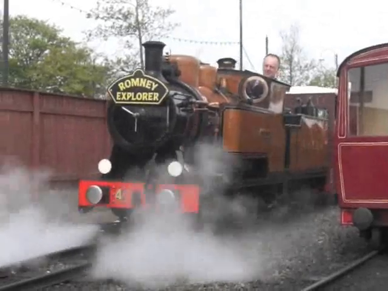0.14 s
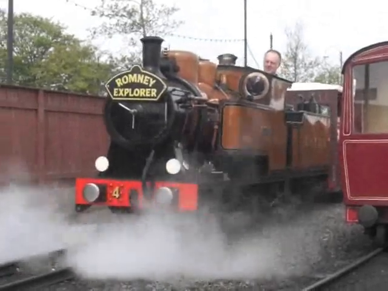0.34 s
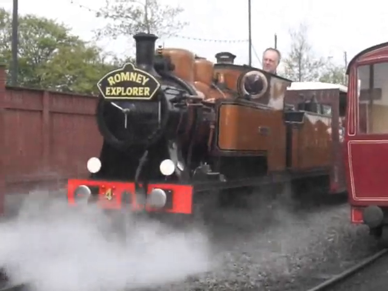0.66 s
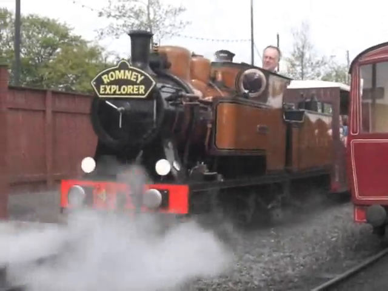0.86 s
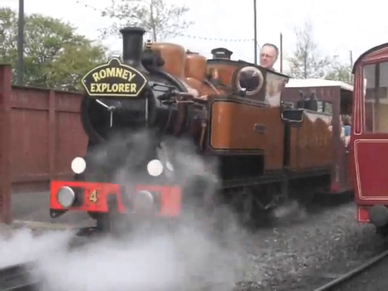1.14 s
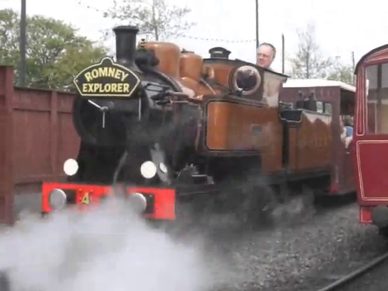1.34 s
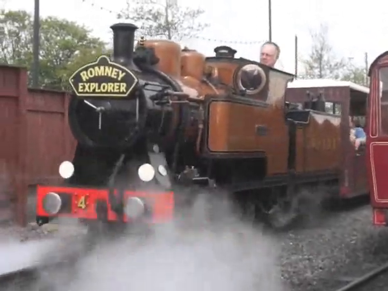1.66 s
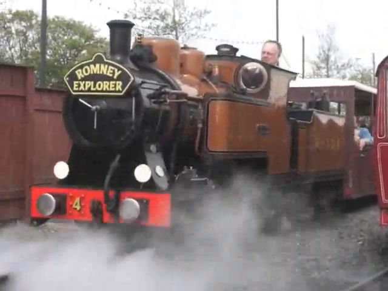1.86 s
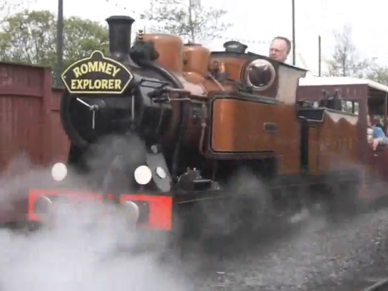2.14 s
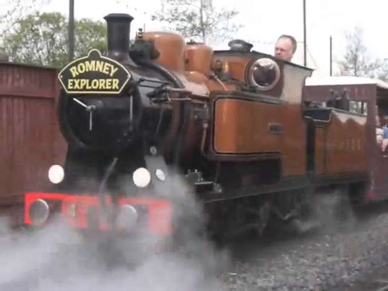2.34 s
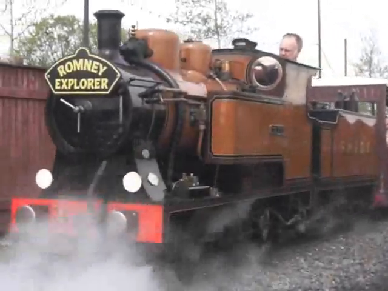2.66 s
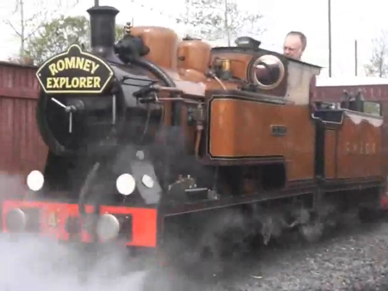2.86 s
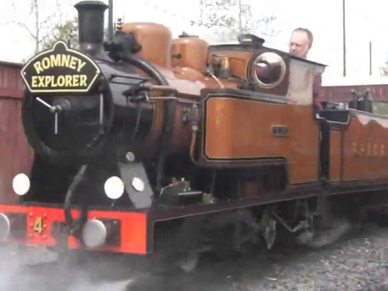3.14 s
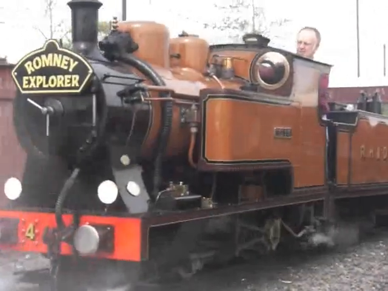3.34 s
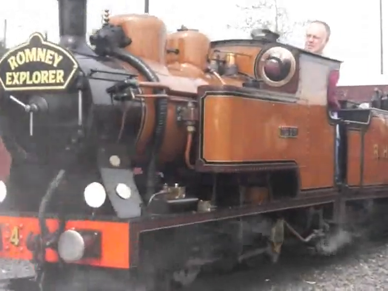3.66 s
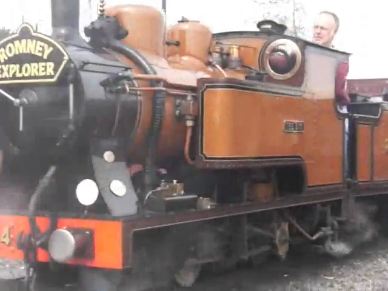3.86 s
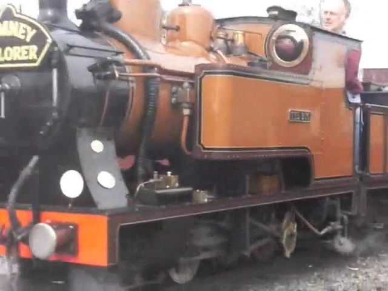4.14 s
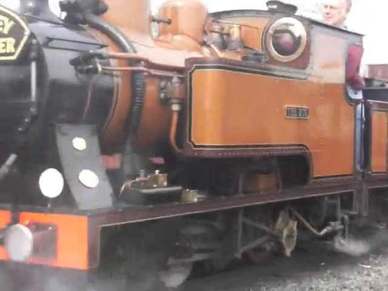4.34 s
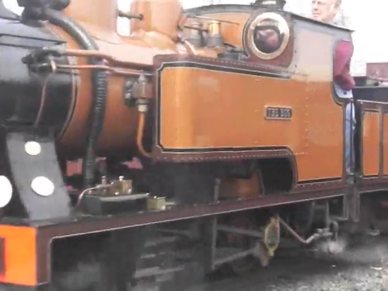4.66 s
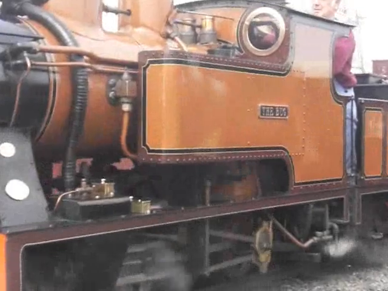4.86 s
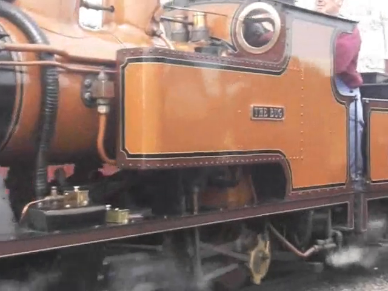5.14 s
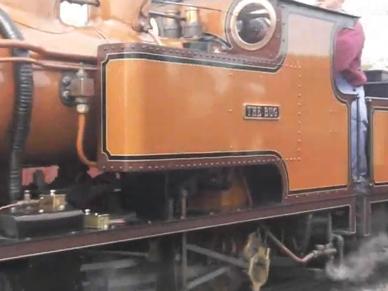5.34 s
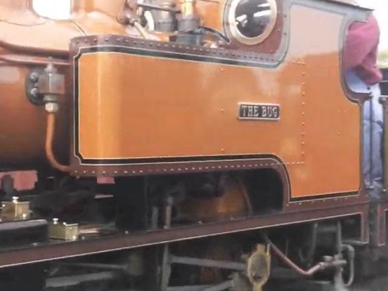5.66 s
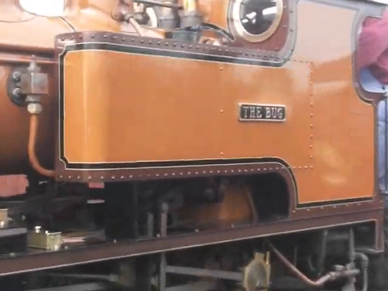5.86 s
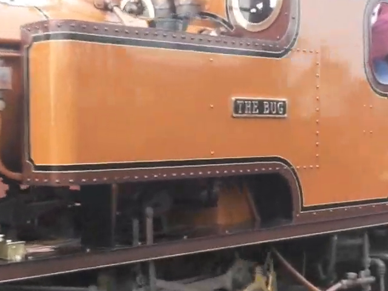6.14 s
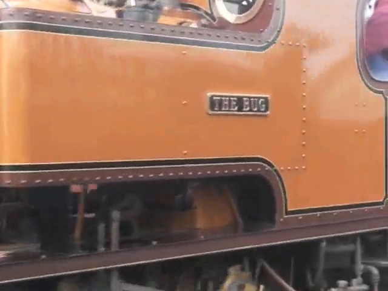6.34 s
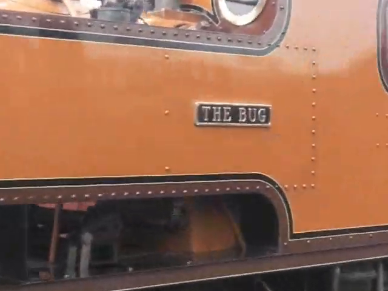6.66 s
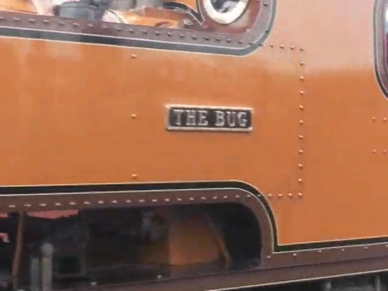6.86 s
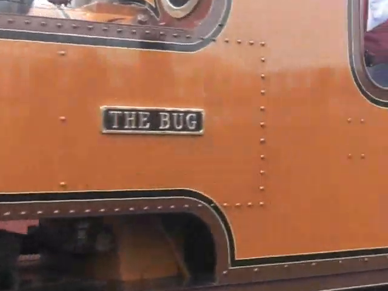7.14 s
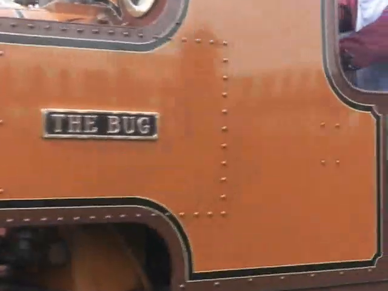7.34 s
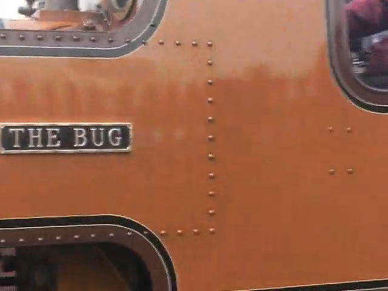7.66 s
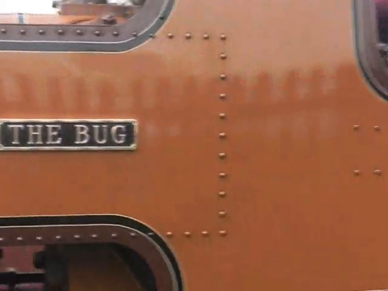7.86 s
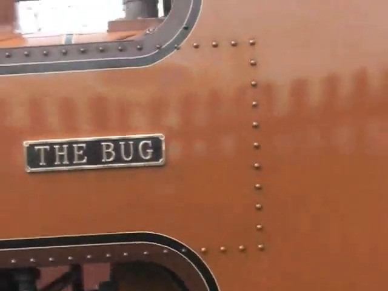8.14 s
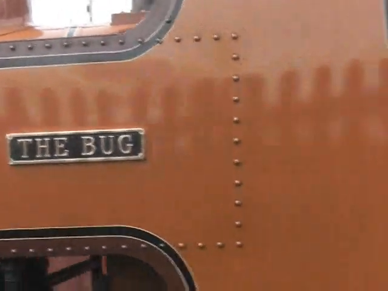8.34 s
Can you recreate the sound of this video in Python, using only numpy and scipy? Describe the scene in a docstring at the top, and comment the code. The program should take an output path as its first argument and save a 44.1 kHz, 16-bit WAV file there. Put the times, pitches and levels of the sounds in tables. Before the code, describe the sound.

A small steam locomotive creeps past, hissing loudly in surges, with soft hollow chuffs that quicken over a low rumble.

```python
"""On a ballasted railway track, a small steam locomotive creeps past with its cylinder drain cocks open.
The turbulent jets hiss in surges and roar where they strike the ground; interference with their ground
reflections gives a slow phasing. Exhaust beats excite the chimney's air column in soft, hollow chuffs
that quicken and come nearer, over a low hum and the rumble of the train."""
import sys
import numpy as np
from scipy import signal
from scipy.fft import rfft, irfft
from scipy.io import wavfile
from scipy.ndimage import uniform_filter1d

SR = 44100
rng = np.random.default_rng(int(sys.argv[2]) if len(sys.argv) > 2 else 0)


def int16_out(signal):
    """Quantize to a 16-bit WAV file."""
    q = np.round(np.clip(np.atleast_2d(signal).T, -1, 1) * 32767)
    wavfile.write(sys.argv[1], SR, q.astype(np.int16))


N = 375275
HOP = 256
TIME = np.arange(N) / SR
FRAME_S = np.arange(N // HOP + 5)[:, None] * HOP / SR
BIN_HZ = np.fft.rfftfreq(4 * HOP, 1 / SR)

# the jets' changing aspect as the engine passes:
# (time [s], share heard from beside [0-1], treble lift [dB/octave], roar relative to rasp [dB])
ASPECT = [(0, 0, 1, -16.5), (1, 0, 1, -17.5), (2.5, 0, 2, -13.5), (3.5, .4, -0.5, -18.5),
          (4.1, 0, 0, -16.5), (4.35, 0.4, 3, -18.5), (5.3, 0.99, 1.5, -17), (6.4, .8, 2, -15),
          (7.2, 0.2, 0, -12.5), (8.51, 0, -0.5, -12)]


def gain_of(db):
    """Decibels to amplitude ratio."""
    return 10 ** (np.asarray(db) / 20)


def unit_rms(x):
    """Normalisation to rms 1."""
    return x / np.sqrt(np.mean(x ** 2) + 1e-20)


def spectrum_db(points, hz):
    """Spectral level, interpolated over log frequency."""
    f, db = np.transpose(points)
    return np.interp(np.log(hz + 1), np.log(f), db)


def follow(rows, t):
    """Linear interpolation of each column at times t."""
    times, *columns = np.transpose(rows)
    return [np.interp(t, times, column) for column in columns]


def add(mix, start_s, sound):
    """Superposition of a sound on the mix."""
    part = mix[round(start_s * SR):][:len(sound)]
    part += sound[:len(part)]


def noise(spectrum):
    """White noise filtered to a given spectrum, rms 1."""
    response = gain_of(spectrum_db(spectrum, np.fft.rfftfreq(N, 1 / SR)))
    return unit_rms(irfft(rfft(rng.standard_normal(N)) * response, N))


def wander(rate_hz):
    """Random modulation, rms 1, strongest near the given rate."""
    ratio = np.fft.rfftfreq(N, 1 / SR) / rate_hz
    return unit_rms(irfft(rfft(rng.standard_normal(N)) * ratio / (1 + ratio ** 3), N))


def swell(t, peak_s):
    """A critically damped pulse: a quick rise to 1, then a slower fall."""
    return t / peak_s * np.exp(1 - t / peak_s)


def gust(start, length, attack_s, release_s, arch_db):
    """Amplitude envelope of a rush of steam: it opens, peaks midway and closes."""
    t = TIME - start
    gate = np.clip(t / attack_s, 0, 1) * np.clip((length - t) / release_s, 0, 1)
    live = gate > 0
    gate[live] *= gain_of(-arch_db * (2 * t[live] / length - 1) ** 2)
    return gate


def jolts(rise_s=.028):
    """Dull jolts of the train as damped pulses: one envelope for rumble, one for running gear."""
    # (time [s], rumble level [dB], running gear level [dB])
    bumps = [(3.46, -46, -60), (3.94, -40, -51), (4.17, -36, -52), (4.56, -42, -55), (6.84, -35, -50)]
    return sum(gain_of(levels_db)[:, None] * swell(np.maximum(TIME - start, 0), rise_s)
               for start, *levels_db in bumps)


def rumble(jolt, gain_db=-1.5):
    """Low rolling noise of the train; rolling and jolts add in power."""
    # rolling noise: (time [s], level [dB])
    levels = [(0, -49), (1, -48.5), (1.8, -45), (3.25, -48.5), (3.95, -40.5), (4.4, -47.5), (5, -47.5),
              (6.6, -50), (8, -42), (8.51, -44)]
    # its spectrum: (frequency [Hz], level [dB])
    spectrum = [(12, -20), (28, -1), (42, -1.5), (65, 1), (100, -1.5), (160, -5), (300, -12.5), (600, -19),
                (1500, -38)]
    rolling = gain_of(follow(levels, TIME)[0])
    return noise(spectrum) * np.hypot(rolling, jolt) * gain_of(gain_db)


def running_gear(jolt, uneven_db=2.5):
    """Wheels and rods grumble: dull noise under random amplitude modulation."""
    # the gear drawing level: (time [s], level [dB])
    levels = [(0, -53), (5.3, -64), (6.7, -59), (7.3, -47), (8.15, -41.5), (8.51, -48)]
    # its spectrum: (frequency [Hz], level [dB])
    spectrum = [(50, -6), (110, -5.5), (230, -4.5), (420, -4), (700, -15), (1500, -30)]
    grumble = gain_of(follow(levels, TIME)[0])
    return noise(spectrum) * np.hypot(grumble, jolt) * gain_of(uneven_db * wander(rate_hz=14))


def hum(waver=0.0043):
    """A low tone and its second harmonic, under slight frequency modulation."""
    # (time [s], pitch [Hz], fundamental level [dB], octave level [dB])
    tone = [(0, 67, -60, -57), (.95, 66.6, -51, -50.5), (1.2, 66.4, -60, -66), (2.9, 63.85, -60, -60),
            (3.6, 64, -55, -54.5), (3.95, 64, -54, -43), (4.5, 63.7, -60, -58), (5.5, 64, -62, -54.5),
            (8.51, 63.2, -63, -55.5)]
    hz, first_db, second_db = follow(tone, TIME)
    phase = 2 * np.pi * np.cumsum(hz * (1 + waver * wander(rate_hz=3.7))) / SR
    return np.sqrt(2) * (gain_of(first_db) * np.sin(phase) + gain_of(second_db) * np.sin(2 * phase))


def chuffs(puff_s=0.011, chuff_db=-1, thump_s=0.016, thump_hz=44, thump_lead_s=0.027, thump_db=1):
    """Each exhaust beat expels a slug of air; its crest and ragged puff excite the chimney's modes."""
    # exhaust beats: (time [s], level [dB], chimney pitch [Hz], thump level [dB])
    beats = [(3.117, -33.5, 574, -56), (3.422, -32, 567, -43), (3.999, -36, 540, -36),
             (4.861, -27.5, 552, -54), (5.417, -33, 505, -52), (5.669, -31, 540, -41),
             (5.908, -34.5, 515, -40), (6.141, -31.5, 528, -46), (6.388, -28, 550, -46),
             (6.622, -30.5, 530, -39), (6.847, -28.5, 520, -42), (7.082, -35, 497, -40),
             (7.308, -25, 560, -46), (7.535, -25, 547, -41), (7.735, -28.5, 530, -39),
             (7.968, -22, 540, -29), (8.185, -20, 533, -37), (8.388, -23.5, 522, -39)]
    # air column resonances: (frequency / pitch [ratio], bandwidth [Hz], level [dB])
    modes = [(1.02, 25, 4.5), (.85, 22, -2.5), (1.13, 55, -5.5), (1.28, 70, -7), (1.48, 110, -12),
             (1.9, 140, -9)]
    out, t = np.zeros(N), np.arange(SR // 4) / SR
    crest = SR // 20
    envelope = np.exp(-abs(t - t[crest]) / puff_s)
    for time_s, level_db, pitch_hz, low_db in beats:
        onset = np.minimum(t * pitch_hz, 1)  # the air column takes a cycle to speak
        ring = np.zeros(len(t))
        for ratio, width_hz, db in modes:
            mode = onset * np.exp(-np.pi * width_hz * t) * np.sin(2 * np.pi * ratio * pitch_hz * t)
            puff = signal.fftconvolve(envelope * rng.standard_normal(len(t)), mode)[:len(t)]
            push = np.r_[np.zeros(crest), mode[:-crest]]
            ring += gain_of(db) * unit_rms(unit_rms(push) + unit_rms(puff))
        ring *= np.linalg.norm(envelope) / np.linalg.norm(ring)
        thump = swell(t, thump_s) * np.sin(2 * np.pi * thump_hz * t)
        add(out, time_s - t[crest], gain_of(level_db + chuff_db) * ring)
        add(out, time_s - thump_lead_s, gain_of(low_db + thump_db) * thump)
    return out


def ground_roar(rasp_flow, blast_flow, roar_db=3.5, flutter_db=0.6):
    """Impingement noise of steam on ballast: a little with every surge, much in a blast."""
    # (frequency [Hz], level [dB])
    spectrum = [(40, -7.5), (120, -5), (250, -1.5), (420, -2), (600, 0), (1100, -1), (1600, 0.5),
                (2500, -1.5), (5000, -25)]
    grazing = rasp_flow * gain_of(follow(ASPECT, TIME)[2])
    roar = noise(spectrum) * np.hypot(grazing, blast_flow)
    return roar * gain_of(roar_db + flutter_db * wander(rate_hz=17))


def passing_rush():
    """Directivity: the focused noise band of the near cock swells and fades as it passes."""
    # (start [s], duration [s], level [dB])
    passage = (3.68, 0.86, -25.5)
    # (frequency [Hz], level [dB])
    spectrum = [(2500, -26), (3300, -6), (4200, -4), (4800, -1), (5350, -1), (5600, -8), (5900, -25),
                (8000, -47)]
    start, length, db = passage
    envelope = gust(start, length, attack_s=0.22, release_s=0.089, arch_db=2)
    return noise(spectrum) * gain_of(db) * envelope


def steam_flow(blast_hiss_db=12.5, band_octaves=0.14):
    """Incoherent leak, surges and blasts add in power: hiss, rasp and blast amplitudes, and band lift."""
    # steam escaping between surges: (time [s], hiss level [dB], rasp level [dB])
    leak = [(0, -23.5, -29), (.8, -22, -29), (1.7, -18, -24), (2.9, -21, -26.5), (3.4, -25, -27),
            (3.62, -25, -27.5), (3.85, -21.5, -22), (4.3, -22.5, -23.5), (4.85, -17, -23), (5.4, -21, -26),
            (6.4, -23, -29.5), (7.7, -24.5, -30.5), (8.51, -23, -30)]
    # blasts that strike the ballast: (start [s], duration [s], roar level [dB])
    blasts = [(1.055, 0.13, -35.5), (1.478, 0.61, -32), (2.06, 0.26, -31.5), (2.306, 0.614, -33),
              (4.388, 0.385, -29.5), (4.902, 0.4, -33)]
    # surges, uneven at first, later one to every two chuffs:
    # (start [s], duration [s], hiss level [dB], rasp level [dB], band centre [Hz], band lift [dB])
    surges = [(-.115, 0.55, -18.5, -31, 8250, 5), (0.452, 0.28, -20.3, -27.5, 6700, 3),
              (.82, 0.42, -20.8, -34, 8000, 6), (1.038, 0.36, -18, -25, 6000, .5),
              (1.444, 0.77, -17.2, -24.5, 6000, 2), (1.578, .13, -16.5, -23, 5500, 3),
              (2.108, 0.5, -16, -23.5, 7000, .5), (2.47, 0.46, -16, -22, 6000, 5),
              (2.907, .21, -16, -26.5, 5200, 1), (3.03, 0.36, -21, -42, 10000, 1),
              (3.433, .14, -19.5, -27, 10500, 3), (3.873, .18, -19, -24.5, 9500, 3),
              (4.081, 0.11, -21, -26, 9500, 1), (4.25, 0.18, -17, -27, 10500, 2),
              (4.34, .47, -16.5, -24, 8500, 2), (4.887, .46, -17, -29.5, 10170, 2),
              (5.469, .12, -22, -29, 10500, 4), (5.623, .16, -19.5, -29, 10500, .5),
              (5.918, .38, -20.5, -28.5, 6000, 1.5), (6.416, 0.31, -21, -31, 6510, 1.5),
              (6.88, 0.34, -19, -29.5, 10600, 3), (7.349, .3, -18, -28.5, 10800, 3),
              (7.792, .35, -18.5, -28, 8350, 2), (8.203, 0.27, -17.5, -29, 7000, 2)]
    blast = sum((gain_of(db) * gust(start, length, attack_s=0.048, release_s=0.034, arch_db=3.5)) ** 2
                for start, length, db in blasts)
    hiss, rasp = gain_of(follow(leak, TIME)) ** 2
    hiss += blast * gain_of(blast_hiss_db) ** 2
    powers, bands = [], []
    for start, length, hiss_db, rasp_db, band_hz, lift_db in surges:
        power = gust(start, length, attack_s=0.033, release_s=0.029, arch_db=5) ** 2
        hiss += power * gain_of(hiss_db) ** 2
        rasp += power * gain_of(rasp_db) ** 2
        powers.append(np.interp(FRAME_S, TIME, power) * gain_of(hiss_db) ** 2)
        bands.append(lift_db * np.exp(-.5 * (np.log2((BIN_HZ + 1) / band_hz) / band_octaves) ** 2))
    # each surge lifts its own band by its share of the hiss power
    band_db = np.hstack(powers) @ np.array(bands) / np.interp(FRAME_S, TIME, hiss)
    return np.sqrt(hiss), np.sqrt(rasp), np.sqrt(blast), band_db


def ground_comb(max_strength=.3):
    """Interference of direct and reflected sound: a moving comb filter, in dB."""
    # the ground reflection: (time [s], delay [ms], strength before the cap [ratio])
    ground = [(0, 1.9, 0.16), (.33, 1.7, 0.26), (.45, 1.42, 0.1), (1.1, 1.3, 0.36), (1.4, 1.5, 0.01),
              (2.4, 1.7, 0.07), (3.1, 1.78, .18), (4, 2.3, .14), (4.6, 2.2, .08), (8.51, 1.9, .07)]
    # all reflections, relative to it: (delay [ratio], strength [ratio])
    paths = [(1, .8), (.865, .8), (1.09, .4), (3.6, .7), (5.3, .5)]
    delay_ms, strength = follow(ground, FRAME_S)
    phase = 2 * np.pi * BIN_HZ * delay_ms / 1000
    reflected = sum(share * np.exp(1j * ratio * phase) for ratio, share in paths)
    return 20 * np.log10(abs(1 + np.minimum(strength, max_strength) * reflected))


def turbulence(shape_db, patchy_db):
    """Noise of rms 1 with a changing spectrum; eddies form brief patches in time and frequency."""
    real, imag, eddies = rng.standard_normal((3, len(FRAME_S), len(BIN_HZ)))
    eddies = uniform_filter1d(eddies, size=18, axis=0)
    eddies = unit_rms(uniform_filter1d(eddies, size=6, axis=1))
    magnitude = gain_of(shape_db + patchy_db * eddies)
    magnitude /= np.sqrt(np.mean(magnitude ** 2, axis=1, keepdims=True))
    _, sound = signal.istft((magnitude * (real + 1j * imag)).T, nperseg=4 * HOP, noverlap=3 * HOP)
    return unit_rms(sound[:N])


def drain_jets(hiss_flow, rasp_flow, band_db, hiss_db=0.91, rasp_db=-0.3, flutter_db=.5, deepen_db=3):
    """Turbulent jet noise of the open cocks; its spectrum depends on direction and on flow."""
    # hiss from ahead, hiss from beside the cylinders, and rasp: (frequency [Hz], level [dB])
    hiss_ahead = [(1500, -31.5), (3500, -11.5), (5200, -3), (6800, 0), (10000, -0.5), (12000, -2.5),
                  (14000, -5.5), (15500, -12)]
    hiss_beside = [(1500, -27), (3500, -10.5), (5700, -1.5), (7500, -2), (10300, 0), (12500, -1.5),
                   (14000, -5.5), (15500, -11)]
    rasp_spectrum = [(900, -28), (1600, -14.5), (2100, -7), (2900, -2), (3600, -0.5), (5400, 1), (6000, -5),
                     (10000, -29)]
    beside, tilt_db, _ = follow(ASPECT, FRAME_S)
    comb_db = ground_comb()
    # a harder jet is brighter: dB/octave of treble for each dB above an easy flow
    brighten, easy_db = 0.17, -17
    flow_db = 20 * np.log10(np.interp(FRAME_S, TIME, hiss_flow))
    tilt_db += brighten * (flow_db - easy_db)
    hiss_shape = (1 - beside) * spectrum_db(hiss_ahead, BIN_HZ) + beside * spectrum_db(hiss_beside, BIN_HZ)
    hiss_shape += tilt_db * np.log2(np.maximum(BIN_HZ / 7000, 1)) + band_db
    # from beside the cylinders the rasp reaches lower
    rasp_shape = spectrum_db(rasp_spectrum, BIN_HZ) + deepen_db * beside / (1 + (BIN_HZ / 1900) ** 6)
    hiss = gain_of(hiss_db) * hiss_flow * turbulence(hiss_shape + comb_db, patchy_db=1.93)
    rasp = gain_of(rasp_db) * rasp_flow * turbulence(rasp_shape + comb_db, patchy_db=1.36)
    # water carried with the steam makes the whole jet flutter
    return (hiss + rasp) * gain_of(flutter_db * wander(rate_hz=10.8))


def scene():
    """All sources superpose at one microphone, alike in both channels."""
    hiss, rasp, blast, band_db = steam_flow()
    rumble_jolt, gear_jolt = jolts()
    mix = drain_jets(hiss, rasp, band_db) + ground_roar(rasp, blast) + chuffs() + hum()
    mix += rumble(rumble_jolt) + running_gear(gear_jolt) + passing_rush()
    return np.array([mix, mix])


def record(dry, notch_hz=7630, half_width_hz=55, notch_depth=0.52, ceiling=.95, cutoff_hz=15480):
    """The microphone's response: a narrow treble notch, soft saturation, then a band limit."""
    hz = np.fft.rfftfreq(N, 1 / SR)
    notch = 1 - notch_depth / (1 + 1j * (hz - notch_hz) / half_width_hz)
    coloured = irfft(rfft(dry) * notch, N)
    limited = coloured / (1 + (coloured / ceiling) ** 8) ** (1 / 8)
    low_pass = signal.firwin(1023, cutoff_hz, window=("kaiser", 9), fs=SR)
    return signal.oaconvolve(limited, low_pass[None], "same")


dry = scene()
out = record(dry)
int16_out(out)
```